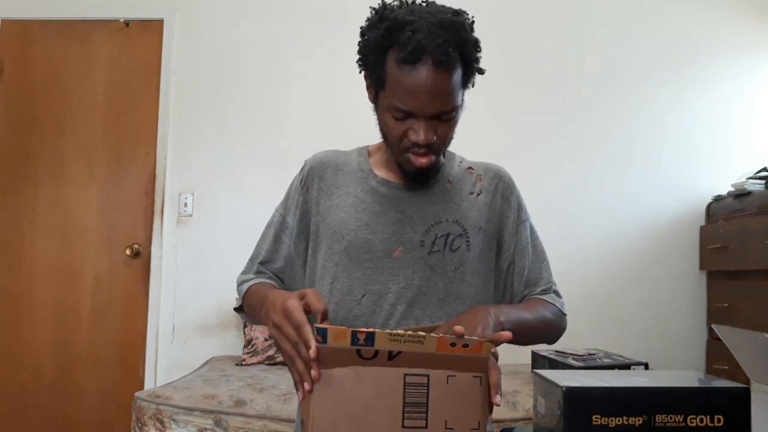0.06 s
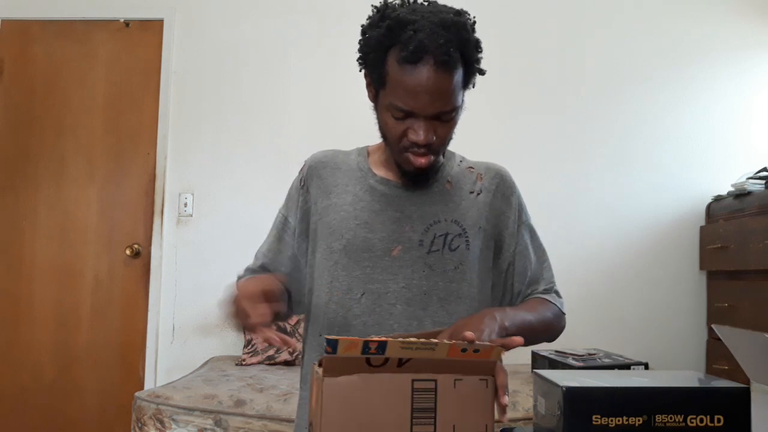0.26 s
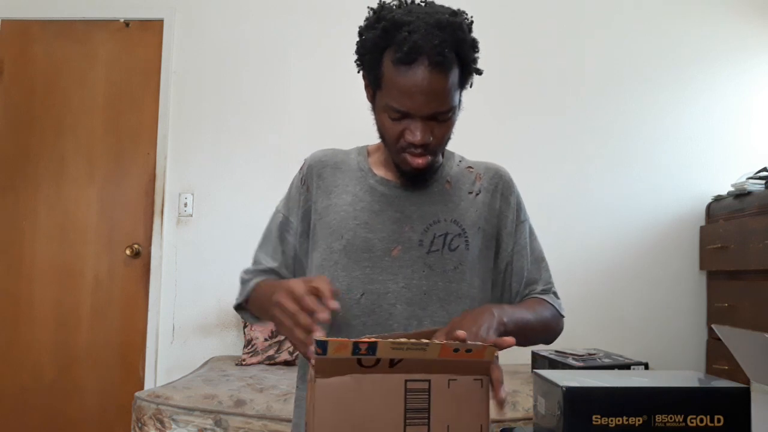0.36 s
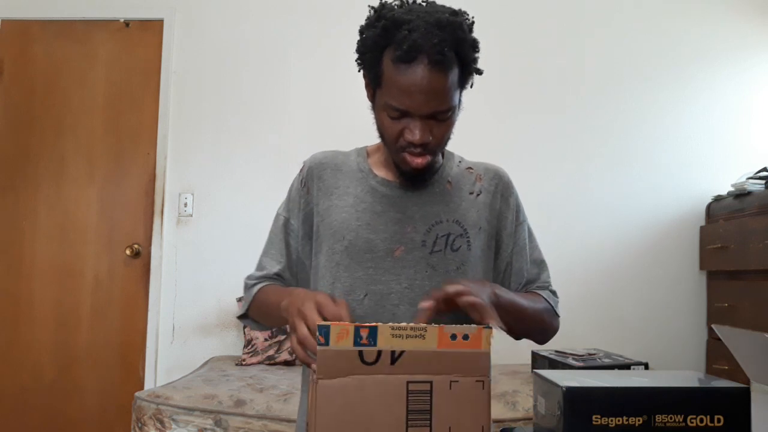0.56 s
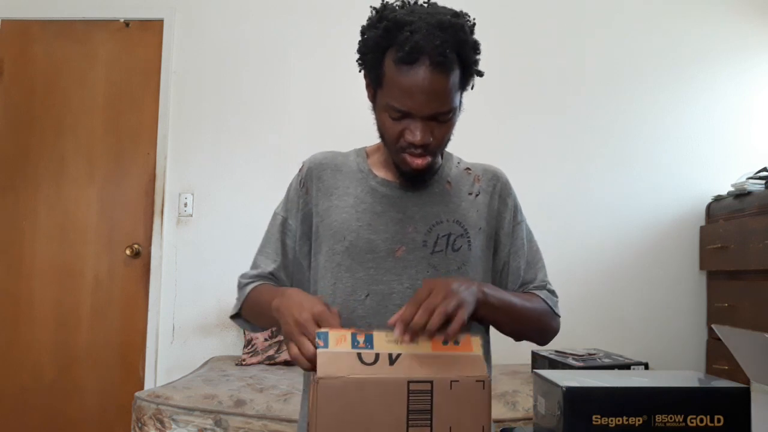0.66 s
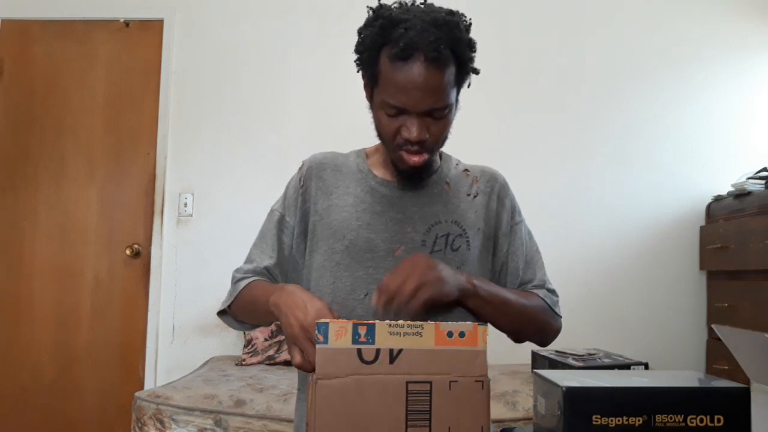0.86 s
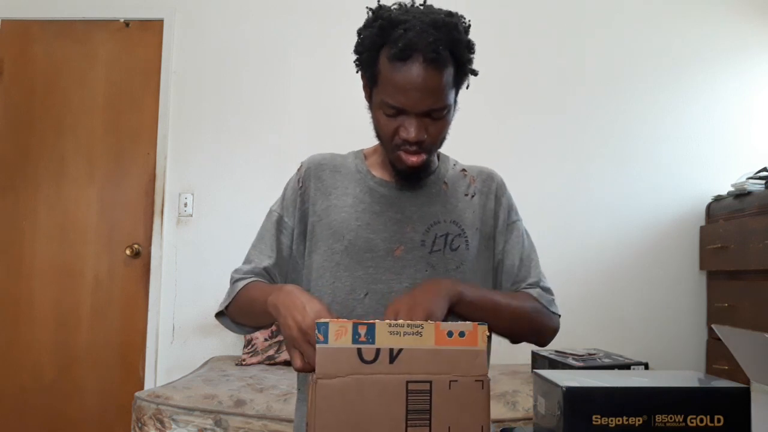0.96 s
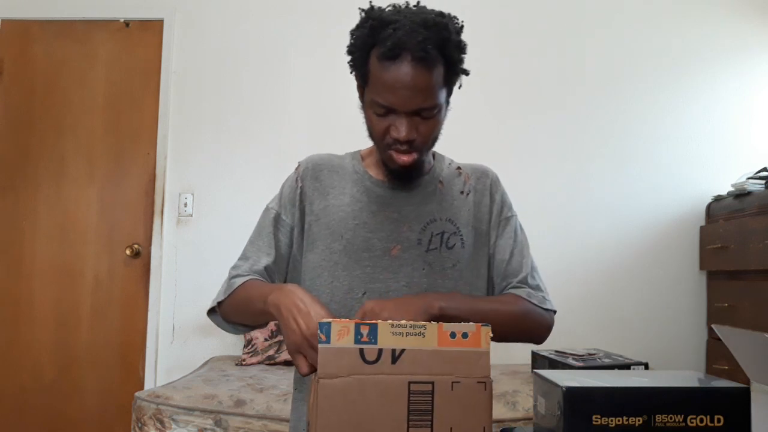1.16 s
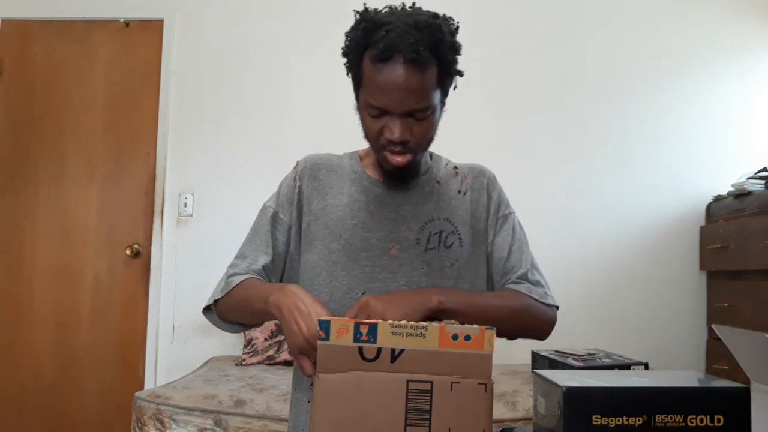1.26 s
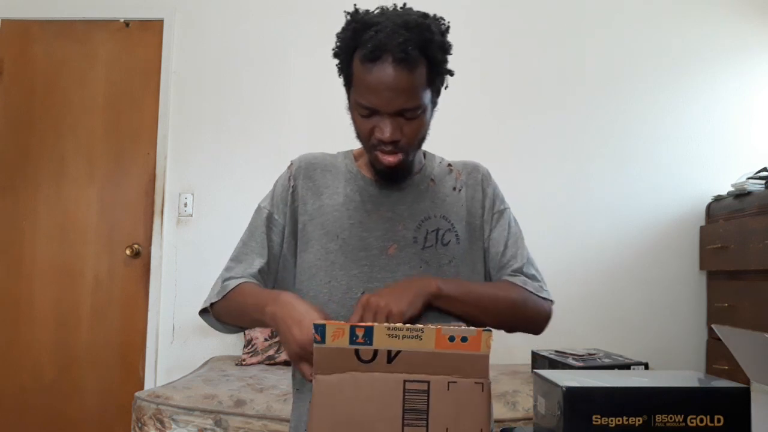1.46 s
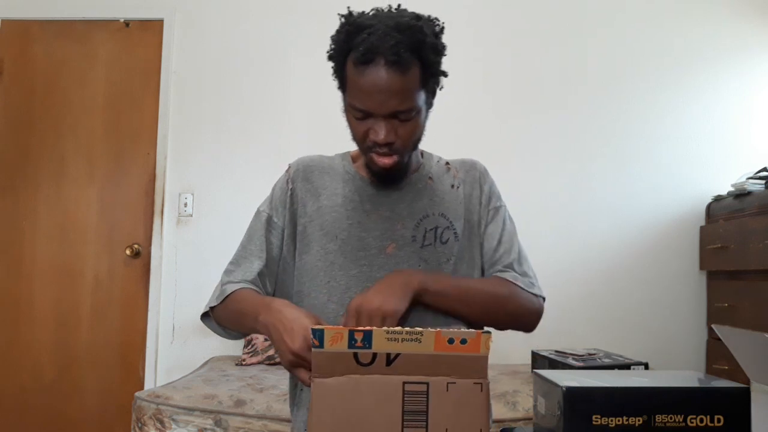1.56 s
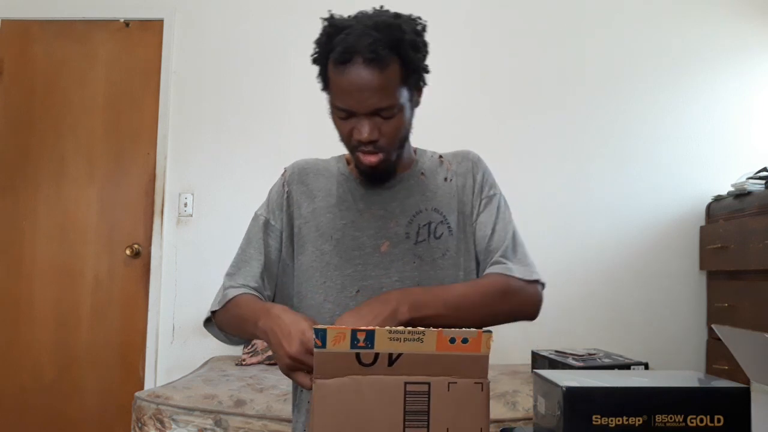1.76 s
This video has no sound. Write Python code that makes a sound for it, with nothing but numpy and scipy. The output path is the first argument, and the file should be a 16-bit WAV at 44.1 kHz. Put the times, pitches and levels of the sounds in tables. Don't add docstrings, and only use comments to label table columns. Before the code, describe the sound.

A cardboard box is opened by hand, with hollow flap knocks, sharp snaps and rustling packing.

```python
import sys
import numpy as np
from scipy import signal
from scipy.fft import rfft, irfft, next_fast_len
from scipy.io import wavfile
from scipy.ndimage import uniform_filter1d, map_coordinates

SR = 44100
rng = np.random.default_rng(int(sys.argv[2]) if len(sys.argv) > 2 else 0)


def pcm_store(signal):
    levels = np.round(np.clip(np.atleast_2d(signal), -1, 1) * 32767)
    wavfile.write(sys.argv[1], SR, levels.astype(np.int16).T)


def magnitude_from_level(level_db):
    exponent = np.asarray(level_db, float) / 20
    return 10 ** exponent


N = 79380

# [f/Hz, width/Hz, level/dB]
BOX_MODES = [(323, 14, 22), (718, 21, -10), (955, 14, 20.5), (1450, 18, 4)]
# [f/Hz, correlation]
LIKENESS = [(100, 0.8), (300, 0.81), (600, 0.069), (1100, -0.29), (8000, -0.36)]


def unit(x):
    return x / np.sqrt(np.mean(x ** 2) + 1e-20)


def along(points, f_hz):
    f, v = np.transpose(points)
    return np.interp(np.log(f_hz + 1), np.log(f + 1), v)


def curve(points):
    t_s, value = np.transpose(points)
    return np.interp(np.arange(N) / SR, t_s, value)


def filtered(x, response):
    size = next_fast_len(x.shape[-1] + 6144)
    spectrum = rfft(x, size) * response(np.fft.rfftfreq(size, 1 / SR))
    return irfft(spectrum, size)[..., :x.shape[-1]]


def causal(points, f):
    cepstrum = irfft(np.log(magnitude_from_level(along(points, f)) + 1e-6))
    half = len(cepstrum) // 2
    cepstrum[1:half] *= 2
    cepstrum[half + 1:] = 0
    return np.exp(rfft(cepstrum))[:len(f)]


def ring(modes, f):
    total = 0
    for k, (centre, width, db) in enumerate(modes):
        damping = 1j * f * width
        total = total + (-1) ** k * magnitude_from_level(db) * damping / (centre * centre - f * f + damping)
    return total


def slips(size, rate_hz, spread_db, noise):
    chance, sign, height = rng.random((3, size))
    sizes = magnitude_from_level(-np.clip(spread_db, 0, 3) * np.log(height + .03))
    pulses = (chance < rate_hz / SR) * np.sign(sign - .5) * sizes
    return unit(pulses) + noise * rng.standard_normal(size)


def wobble(rate_hz):
    knots = rng.standard_normal(int(N * rate_hz / SR) + 4)
    return map_coordinates(knots, [np.arange(N) * rate_hz / SR])


def room(x, wet_db):
    # [f/Hz, t60/s]
    decay = [(100, 0.14), (400, 0.21), (1500, 0.29), (4000, 0.27), (12000, 0.27)]
    wall_s = .003
    hz, t, z = signal.stft(rng.standard_normal((2, SR // 3)), SR, nperseg=256)
    angle = np.arccos(np.clip(along(LIKENESS, hz), -1, 1))[:, None] / 2
    mid, side = np.cos(angle) * z[0], np.sin(angle) * z[1]
    z = np.array([mid + side, mid - side])
    tail = signal.istft(z * magnitude_from_level(-60 * t / along(decay, hz)[:, None]), SR, nperseg=256)[1]
    tail = tail * (1 - np.exp(-(np.arange(tail.shape[1]) / SR / wall_s) ** 2))
    tail = tail * magnitude_from_level(wet_db) / np.linalg.norm(tail[0])
    tail[:, 0] = 1
    return signal.fftconvolve(x[None], tail, axes=1)


def bursts(events, rate_hz, t60_s, colour, swell, judder, wet_db, blow):
    attack_s, softens_s = .0003, 0.017
    waver, locks_hz = .1, 600
    out, t = np.zeros((2, N + 2 * SR)), np.arange(SR // 12) / SR
    for start_s, db, hz, hold_s in events:
        rise = 1 - np.exp(-t / (attack_s + swell * hold_s))
        shape = rise * magnitude_from_level(-60 * np.maximum(t - hold_s, 0) / t60_s)
        wander = unit(uniform_filter1d(rng.standard_normal(len(t)), size=200))
        cycles = np.cumsum(hz / SR * (1 + waver * wander))
        locked = unit(np.diff(np.floor(cycles), prepend=0))
        loose = slips(len(t), rate_hz, spread_db=-0.5, noise=0.65)
        push = shape * (loose + judder * locked * min(1, (locks_hz / hz) ** 3))
        push[0] = blow * np.exp(-hold_s / softens_s)
        x = filtered(push, lambda f: colour(f, hz))
        x = magnitude_from_level(db) * x / np.linalg.norm(x) * np.sqrt((hold_s + t60_s / 8) * SR)
        wet = room(x, wet_db)
        out[:, round(start_s * SR):][:, :wet.shape[1]] += wet
    return out[:, :N]


def knocks():
    # [t/s, level/dB, panel pitch f/Hz, judder length/s]
    knock_events = [(.0, -49.5, 260, 0.0074), (.012, -54, 1204, 0.026), (.060, -40.5, 460, 0.0018),
                    (.072, -49.5, 1320, .02), (.232, -33.5, 139, 0.022), (.098, -52, 1240, 0.012),
                    (.144, -52, 1230, 0.0046), (.16, -48.5, 1250, 0.014), (.188, -43, 492, .012),
                    (.204, -23.5, 310, 0.0065), (.213, -31, 966, 0.014), (.216, -33, 328, 0.036),
                    (.226, -28, 933, 0.013), (.23, -31.5, 452, 0.0046), (.249, -29, 383, 0.0055),
                    (.255, -29.5, 109.7, .012), (.271, -36.5, 493, 0.0052), (.316, -46, 315, .006),
                    (.32, -45, 98.8, 0.01), (.695, -52.5, 70, 0.021), (.514, -35.5, 570.4, .014),
                    (.52, -60, 1070, 0.017), (.541, -44, 710, 0.0042), (.546, -45, 1050, 0.0032),
                    (.553, -40, 772, 0.0055), (.556, -43.5, 445, .004), (.573, -40.5, 746, 0.0051),
                    (.58, -52, 530, 0.0073), (.682, -62, 720, 0.0035), (.698, -50, 470, .008),
                    (.713, -36.5, 536, 0.014), (.722, -43, 945, 0.01), (.733, -25, 319, 0.0036),
                    (.739, -32, 565, 0.0098), (.75, -36, 330, 0.0089), (.756, -35, 778, 0.0045),
                    (.8855, -43, 805, 0.006), (.8905, -32.5, 435, 0.0018), (.915, -45.5, 433, 0.012),
                    (1.0535, -33.5, 402, 0.005), (1.058, -43.5, 1030, 0.017), (1.063, -38, 335.4, 0.021),
                    (1.086, -34, 356, 0.0041), (1.146, -33.5, 230, 0.003), (1.147, -42.5, 1030, 0.047),
                    (1.465, -52, 211, 0.034), (1.51, -48, 272, 0.0028), (1.59, -46.5, 531, 0.0053),
                    (1.68, -46.5, 1007, 0.023), (1.74, -53, 604, 0.033)]
    # [f/Hz, density/dB per Hz]
    board_colour = [(30, -25), (100, 2.5), (300, 2.5), (900, -3.5), (1500, -8), (2500, -13.5), (7000, -20),
                    (16000, -89)]
    panel_q, panel_db, hollow_db = 3, 6.5, -15.5
    dull_above, thin_below = 5, .4

    def colour(f, hz):
        hollow = 1 + magnitude_from_level(hollow_db) * ring(BOX_MODES, f)
        dull = 1 + 1j * f / (dull_above * hz)
        thin = (1j * f / (thin_below * hz + 1j * f)) ** 2
        panel = ring([(hz, hz / panel_q, 0)], f) ** 2
        return causal(board_colour, f) * hollow / dull * thin + magnitude_from_level(panel_db) * panel

    return bursts(knock_events, rate_hz=700, t60_s=0.028, colour=colour, swell=.02, judder=1,
                  wet_db=-1.5, blow=19)


def snaps():
    # [t/s, level/dB, centre f/Hz, crackle length/s]
    snap_events = [(.056, -41.5, 2690, 0.00083), (.078, -61, 2400, .012), (.2012, -17.5, 3060, 0.0059),
                   (.211, -20.5, 3070, 0.0098), (.217, -37, 3380, 0.0019), (.225, -35, 4350, 0.043),
                   (.535, -42.5, 2500, .012), (.547, -57, 2930, 0.0051), (.561, -51, 2440, 0.013),
                   (.616, -56, 2500, .006), (.662, -47.5, 2500, 0.0083), (.71, -50, 2620, 0.0078),
                   (.7315, -29, 2870, .004), (.742, -45.5, 3100, 0.0099), (.762, -34, 2000, 0.0042),
                   (.8855, -42.5, 3650, 0.00092), (.891, -41.5, 2400, 0.00065), (1.055, -55, 2840, 0.041),
                   (1.146, -46.5, 2680, 0.024), (1.168, -32, 4130, 0.00078), (1.174, -37, 6650, 0.0017),
                   (1.18, -43.5, 4270, 0.015), (1.263, -49, 12000, .001), (1.2946, -60, 2500, 0.0026),
                   (1.392, -56, 3110, 0.0027), (1.4832, -47, 2500, 0.00059), (1.496, -47.5, 4460, 0.0024),
                   (1.5226, -50, 2400, 0.0027)]
    # [f/Hz, density/dB per Hz]
    crackle_colour = [(300, -28.5), (900, -4), (2000, 1.5), (3000, -6), (4500, -9), (7000, -13.5),
                      (11000, -13.5), (16000, -14)]
    crease_q, crease_db = 5, 10

    def colour(f, hz):
        return causal(crackle_colour, f) * (1 + ring([(hz, hz / crease_q, crease_db)], f))

    return bursts(snap_events, rate_hz=3000, t60_s=0.0067, colour=colour, swell=.1, judder=0.41,
                  wet_db=1.5, blow=10)


def rubbing():
    # [t/s, level/dB]
    rub_level = [(0, -45.5), (.05, -55.5), (.07, -49), (.13, -50.5), (.19, -46.5), (.4, -44), (.5, -55.5),
                 (.65, -61.5), (.72, -39.5), (.86, -54.5), (1, -69), (1.13, -41.5), (1.27, -54),
                 (1.45, -51), (1.52, -50.5), (1.65, -56), (1.72, -43.5), (1.8, -54)]
    # [f/Hz, density/dB per Hz]
    scraped_colour = [(30, -31), (100, -10), (300, -2.5), (700, -2.5), (1300, -8.5), (2000, -13),
                      (7000, -25), (16000, -85)]
    # [peak t/s, level/dB, swell/s, fade/s]
    stroke_events = [(0.209, -37.5, 0.011, 0.072), (.33, -41.5, 0.038, 0.04), (.47, -54.5, 0.095, 0.038),
                     (0.556, -43, 0.026, 0.025), (0.698, -43, 0.022, 0.033), (0.744, -37, 0.017, 0.015),
                     (1.185, -60, 0.0075, 0.051), (1.301, -48.5, 0.015, 0.054), (1.37, -66, 0.049, 0.041),
                     (1.43, -52.5, 0.028, 0.02), (1.56, -49.5, 0.052, 0.065), (1.72, -44.5, 0.069, 0.081)]
    # [f/Hz, density/dB per Hz]
    packing_colour = [(300, -29), (1000, 2.5), (2500, 5.5), (4200, 2.5), (7000, -4), (10000, -4),
                      (13000, -7), (16000, -2.5)]
    # [t/s, level/dB]
    slide_level = [(1.4, -110), (1.5, -68), (1.57, -58), (1.59, -51), (1.614, -55), (1.625, -50),
                   (1.68, -49), (1.74, -51), (1.8, -49)]
    # [f/Hz, width/Hz, level/dB]
    sheet_modes = [(2600, 190, -4), (4240, 170, 9), (6200, 1100, -9), (6600, 260, -5)]
    rub_hz, rustle_hz = 1500, 5000
    t = np.arange(N) / SR

    board = slips(N, rub_hz, spread_db=0.5, noise=0.79)
    board = unit(filtered(board, lambda f: causal(scraped_colour, f) * (1 + 0.049 * ring(BOX_MODES, f))))
    packing = slips(N, rustle_hz, spread_db=-3.5, noise=1.0)
    packing = unit(filtered(packing, lambda f: causal(packing_colour, f)))
    sheet = slips(N, rustle_hz, spread_db=4, noise=0.91)
    sheet = unit(filtered(sheet, lambda f: ring(sheet_modes, f)))

    strokes = np.zeros(N)
    for peak_s, db, swell_s, fade_s in stroke_events:
        strokes += magnitude_from_level(db) * np.exp(-((t - peak_s) / np.where(t < peak_s, swell_s, fade_s)) ** 2)
    x = magnitude_from_level(curve(rub_level) + 3.3 * wobble(40.17)) * board
    x = x + strokes * magnitude_from_level(2.2 * wobble(60.08)) * packing
    x = x + magnitude_from_level(curve(slide_level) + 1.5 * wobble(70.86)) * sheet

    parts = 6
    place = np.arange(N) / N * parts
    fades = np.clip(1 - abs(place - np.arange(parts + 1)[:, None]), 0, 1)
    return sum(room(x * fade, wet_db=-2)[:, :N] for fade in fades)


def hush():
    # [f/Hz, density/dB per Hz]
    hush_colour = [(25, -16), (100, -8), (400, -18), (1300, -30), (3000, -13), (7000, -22), (11000, -24),
                   (16000, -20.5)]

    def mid_side(f):
        angle = np.arccos(np.clip(along(LIKENESS, f), -1, 1)) / 2
        return magnitude_from_level(along(hush_colour, f)) * [np.cos(angle), np.sin(angle)]

    mid, side = filtered(rng.standard_normal((2, N)), mid_side)
    return magnitude_from_level(-62) * unit(np.array([mid + side, mid - side]))


def scene():
    return knocks() + snaps() + rubbing() + hush()


def top_cut(x):
    return signal.sosfilt(signal.butter(12, 16240, fs=SR, output="sos"), x)


def record(dry):
    # [f/Hz, gain/dB]
    housing = [(1450, 1), (1750, -3.5), (2400, 0.5), (6900, 1.5), (8000, -13), (9500, -10.5), (11500, -3),
               (15500, -8)]
    # [f/Hz, left minus right/dB]
    port_level = [(300, .4), (1000, -.8), (5000, -2.2), (12000, -1.6)]
    # [f/Hz, phase/rad]
    port_lead = [(100, -1), (400, 0.26), (1290, -0.78), (2400, -0.5), (5500, -1.1), (9220, -2),
                 (11300, -3.5), (15800, -15)]
    top_hz = 15950
    half = np.array([[.5], [-.5]])

    def response(f):
        ports = magnitude_from_level(along(port_level, f) * half) * np.exp(1j * along(port_lead, f) * half)
        return causal(housing, f) * ports * (f < top_hz)

    return top_cut(filtered(dry, response))


dry = scene()
out = record(dry)
pcm_store(out)
```